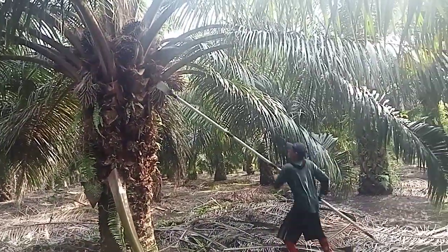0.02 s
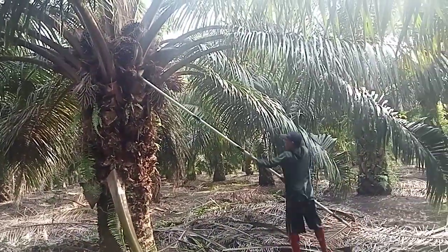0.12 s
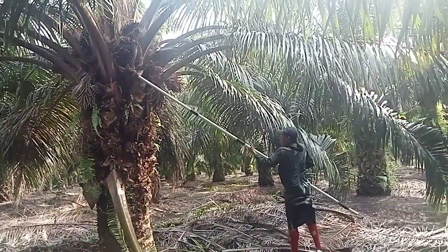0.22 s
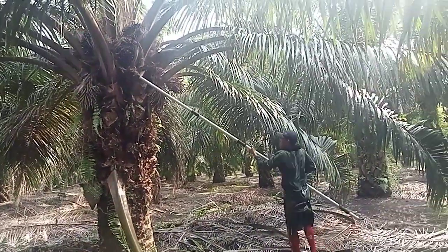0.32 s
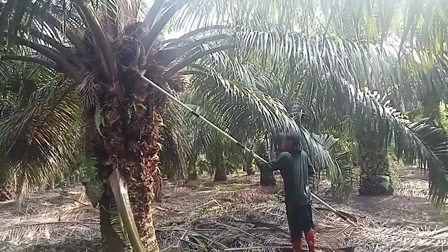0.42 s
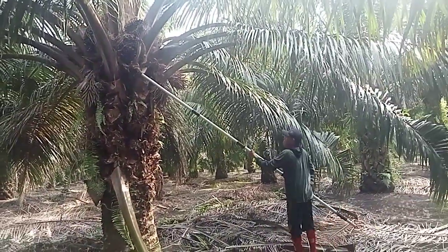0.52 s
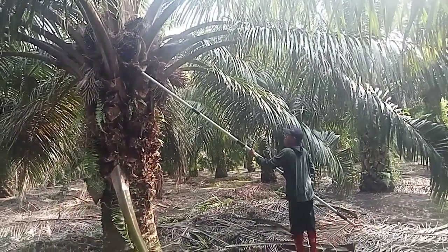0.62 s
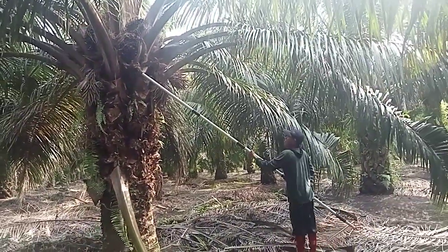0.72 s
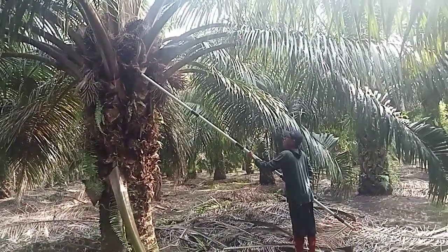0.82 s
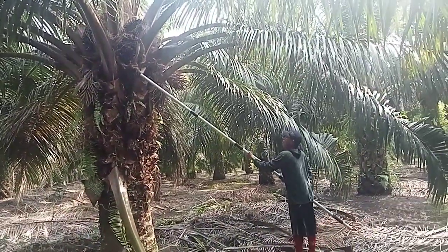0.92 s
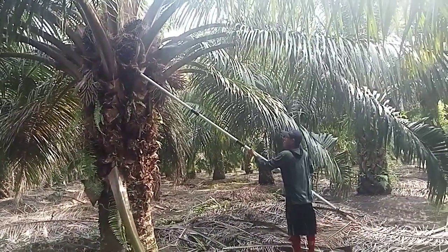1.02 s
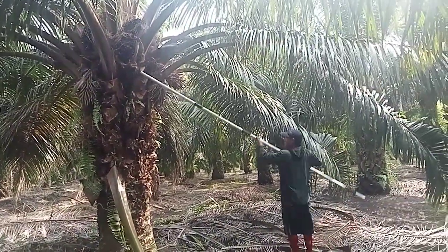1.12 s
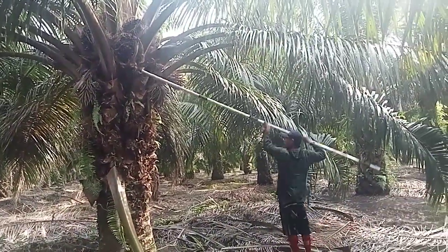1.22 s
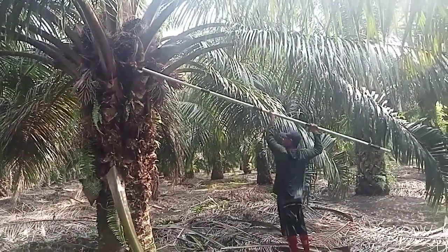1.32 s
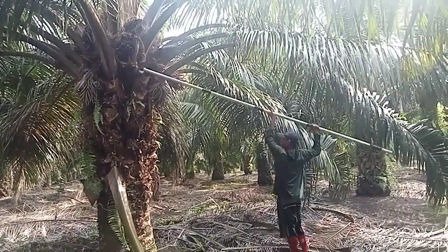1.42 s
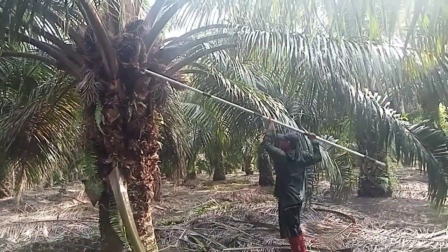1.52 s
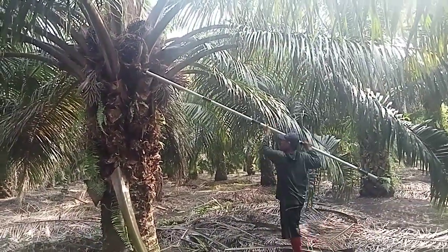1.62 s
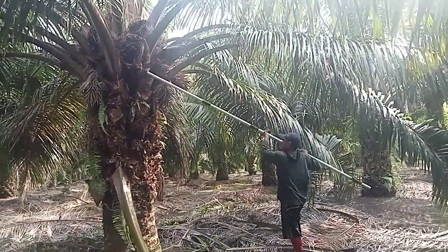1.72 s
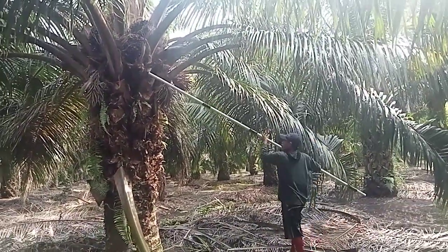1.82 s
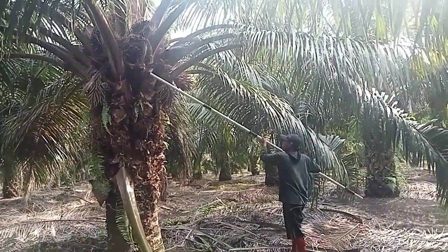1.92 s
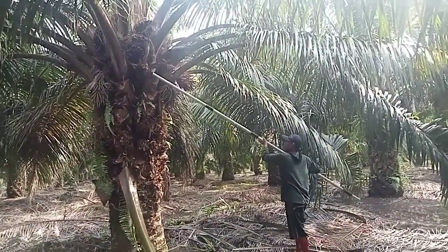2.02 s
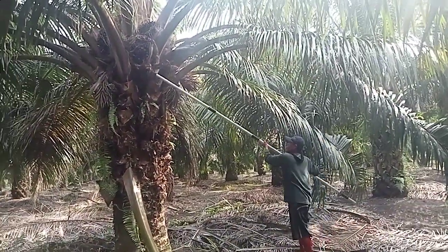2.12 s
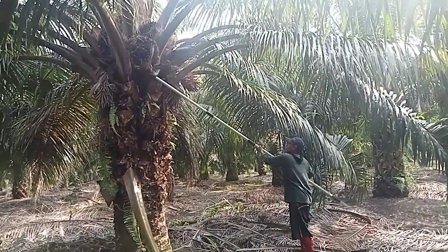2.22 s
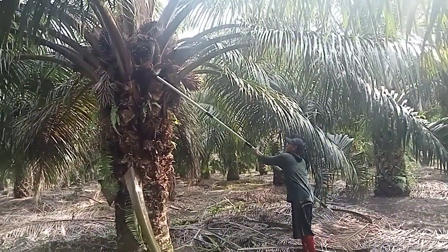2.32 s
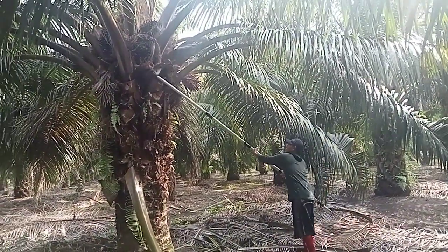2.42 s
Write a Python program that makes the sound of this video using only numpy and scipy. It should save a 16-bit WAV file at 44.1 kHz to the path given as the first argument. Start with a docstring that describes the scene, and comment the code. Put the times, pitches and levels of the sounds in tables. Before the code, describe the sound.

Palm stalk cutting outdoors: one loud crunching chop, a rasping stuttering pull, then a smaller tearing cut

```python
"""One hard chop, a juddering pull and a tearing cut, with knocks, dry snaps and hissing leaflets between:
a sickle on a long pole works in the crown of an oil palm.
Tears, knocks, snaps and leaflets are filtered random fractures; thuds are wobbling low tones; the pull is
a train of stick-slip pulses with rasping grains. The grove adds a faint noise tail, and soft air noise
lies underneath. Both channels are the same."""
import sys
import numpy as np
from scipy import signal
from scipy.fft import rfft, irfft
from scipy.io import wavfile
from scipy.ndimage import uniform_filter1d

SR = 44100
rng = np.random.default_rng(int(sys.argv[2]) if len(sys.argv) > 2 else 0)


def bounce(signal):
    """Save signal as a 16-bit WAV file at the path given by the first command-line argument."""
    frames = np.transpose(np.atleast_2d(signal))
    limited = np.clip(frames, -1, 1)
    pcm = np.round(limited * 32767).astype(np.int16)
    wavfile.write(sys.argv[1], SR, pcm)


N = 110250
T = np.arange(N) / SR
SIZE = 2 ** 18  # FFT length, samples
HZ = np.maximum(np.arange(SIZE // 2 + 1) * SR / SIZE, 1)
FIBRES_PER_S, FIBRE_SPREAD_DB = 12000, 2

# colour of snapping fibres and flicked leaflets: (frequency [Hz], gain [dB])
SNAP_COLOUR = [(100, -28), (500, -15), (1500, -4.5), (2300, -3), (5000, -2.5), (7500, -4.5), (10000, 4),
               (12500, -10), (15500, -12.5)]


def from_db(db):
    """Decibels to amplitude gain."""
    return 10 ** (np.asarray(db) / 20)


def rms_one(x):
    """Scale to rms 1."""
    return x / np.sqrt(np.mean(np.abs(x) ** 2) + 1e-20)


def in_time(rows):
    """Control curve at every sample, linear between (time, value) rows."""
    return np.interp(T, *np.transpose(rows))


def colour(points):
    """Gain at every FFT frequency; dB linear over log frequency."""
    hz, db = np.transpose(points)
    return from_db(np.interp(np.log(HZ), np.log(hz), db))


def peak(hz, width_hz):
    """Gain of one resonance, 1 on top."""
    return 1 / np.sqrt(1 + ((HZ ** 2 - hz ** 2) / (HZ * width_hz)) ** 2)


def body(x, gain):
    """Minimum-phase filter with the shape of gain, scaled to keep the power of white noise."""
    cepstrum = irfft(np.log(rms_one(gain) + 1e-6))
    # fold the cepstrum onto positive time: makes the filter causal
    cepstrum[1:SIZE // 2] *= 2
    cepstrum[SIZE // 2 + 1:] = 0
    response = np.exp(rfft(cepstrum))
    return irfft(rfft(x, SIZE) * response)[:N]


def band(x, hz, width_hz):
    """Two-pole resonance that keeps the power of white noise."""
    r = np.exp(-np.pi * width_hz / SR)
    zeros = np.sqrt((1 - r * r) / 2) * np.array([1, 0, -1])
    poles = [1, -2 * r * np.cos(2 * np.pi * hz / SR), r * r]
    return signal.lfilter(zeros, poles, x + 1e-18)


def butter(x, order, hz, kind="low"):
    """Butterworth filter."""
    return signal.lfilter(*signal.butter(order, hz, kind, fs=SR), x)


def crackle(per_s, spread_db):
    """Random tiny fractures of uneven size and either sign; rms 1."""
    sizes = from_db(spread_db * np.minimum(rng.exponential(1, N), 4))
    signs = rng.choice([-1, 1], N)
    occurs = rng.random(N) < per_s / SR
    return rms_one(sizes * signs * occurs)


def envelope(s, attack_s, hold_s, t60_s):
    """Linear rise from s; exponential decay factor from s + hold_s, 60 dB per t60_s."""
    rise = np.clip((T - s) / attack_s, 0, 1)
    decay_db = -60 * np.clip((T - s - hold_s) / t60_s, 0, 3)
    return rise * from_db(decay_db)


def bursts(rows):
    """Fracture bursts, each with its own envelope and its own bass and treble shelves."""
    bass_edge_hz, treble_edge_hz = 520, 1700
    grains = crackle(FIBRES_PER_S, FIBRE_SPREAD_DB)
    low, middle, high = np.zeros((3, N))
    for s, attack_s, hold_s, t60_s, db, bass_db, treble_db in rows:
        burst = grains * envelope(s, attack_s, hold_s, t60_s) * from_db(db)
        low = low + burst * from_db(bass_db)
        middle = middle + burst
        high = high + burst * from_db(treble_db)
    bass_shelf = butter(low - middle, 1, bass_edge_hz)
    treble_shelf = butter(high - middle, 1, treble_edge_hz, "high")
    return middle + bass_shelf + treble_shelf


def smear(x):
    """All-pass echoes spread each pulse over several milliseconds."""
    # all-pass echoes that spread each pulse: (delay [s], strength [ratio])
    echoes = [(.0011, 0.59), (.0019, .55), (.0031, .45)]
    spectrum = rfft(x, SIZE)
    for delay_s, strength in echoes:
        late = np.exp(-2j * np.pi * HZ * delay_s)
        g = np.clip(strength, 0, .9)
        spectrum = spectrum * (late - g) / (1 - g * late)
    return irfft(spectrum)[:N]


def stalk_resonances():
    """The cut stalk and blade boost or dip the spectrum at their modes."""
    # modes of stalk and blade: (frequency [Hz], width [Hz], boost of the mode alone [dB])
    modes = [(239.8, 25, 1.5), (595, 45, 5), (1101, 16, 3.5), (1453, 100, 7), (1644, 40, 8),
             (2130, 79, 2.5), (2280, 84, 2.5), (2230, 8.3, -0.5), (2740, 29, 4.5), (3964, 8.3, 3.5),
             (4880, 70, 4.5), (5064, 12, 6), (4930, 65, 6.5), (6190, 35, 3), (7007, 23, 7.5)]
    gain = 1 + sum((from_db(db) - 1) * peak(hz, width_hz) ** 2 for hz, width_hz, db in modes)
    return np.abs(gain)


def outdoor_air():
    """Steady coloured noise."""
    air_db = -67
    # colour of the air: (frequency [Hz], gain [dB])
    air_colour = [(20, -27), (50, -12), (100, -3), (200, -6.5), (500, -8), (1000, -11), (2000, -13.5),
                  (6000, -16.5), (15500, -34)]
    return from_db(air_db) * body(rng.standard_normal(N), colour(air_colour))


def grove(x):
    """Trunks and crowns scatter a diffuse tail: convolution with decaying noise."""
    tail_db, t60_s, delay_s = -18, 0.37, .02  # the tail rises over delay_s, then decays
    # colour of the tail: (frequency [Hz], gain [dB])
    tail_colour = [(80, -13), (300, -9), (1000, -6.5), (2000, -3.5), (5000, -5.5), (10000, -6),
                   (15500, -15)]
    tail = rng.standard_normal(N) * envelope(0, delay_s, delay_s, t60_s)
    tail = tail / np.sqrt(np.sum(tail ** 2))
    scattered = signal.fftconvolve(x, tail)[:N]
    return from_db(tail_db) * body(scattered, colour(tail_colour))


def leaflets():
    """Dense fractures as dry leaflets brush each other, plus sparse smeared flicks."""
    ticks_per_s, spread_db = 10000, 3
    flicks_per_s, flick_spread_db, flick_offset_db = 30, 2.5, -13
    # shaking of the leaflets: (time [s], level [dB])
    shaking = [(0, -41.5), (.18, -48), (.4, -46), (.6, -50.5), (.9, -56), (1.07, -59), (1.45, -58),
               (1.6, -63), (1.85, -58.5), (2.02, -69.5), (2.16, -62.5), (2.25, -59.5), (2.36, -45.5),
               (2.5, -54)]
    # colour of the brushing: (frequency [Hz], gain [dB])
    leaf_colour = [(60, -24.5), (130, -11.5), (400, -15), (900, -11.5), (1500, -9), (2400, -0.5),
                   (3300, -5), (5300, 0), (7000, -11), (8300, -7.5), (9700, 1.5), (11000, -7.5),
                   (13000, -16), (15500, -16)]
    level_db = in_time(shaking)
    brushing = body(crackle(ticks_per_s, spread_db) * from_db(level_db), colour(leaf_colour))
    flicks = crackle(flicks_per_s, flick_spread_db) * from_db(level_db + flick_offset_db)
    return brushing + body(smear(flicks), colour(SNAP_COLOUR))


def knocks():
    """The pole knocks on stalks: short fracture bursts ring the stalk modes."""
    attack_s, hold_s = 0.0015, 0.00096
    # knocks: (time [s], level [dB], t60 [s], bass [dB], treble [dB])
    hits = [(0.192, -41.5, 0.09, -9, 3), (0.442, -50.5, 0.3, 8, -9), (.537, -36.5, 0.099, -0.5, 2.5),
            (0.634, -46.5, 0.13, 6, 5), (1.091, -33, 0.014, 3, -14), (1.0989, -35.5, 0.067, -11, -3.5),
            (1.172, -34, 0.032, 5.5, -24), (1.447, -39, 0.046, 8.5, -6), (1.661, -45, 0.045, 1, -7),
            (1.725, -53.5, 0.043, -7, 4.5), (1.814, -66.5, 0.057, -3, 10), (1.886, -46, 0.088, -7, -6),
            (2.088, -66, .1, -6, 5.5), (2.2647, -34.5, 0.067, 12, -2.5), (2.402, -33, 0.036, -7, -6)]
    # colour of a knock: (frequency [Hz], gain [dB])
    knock_colour = [(60, -35), (200, -13.5), (400, -10), (560, -4), (790, -8.5), (970, -4.5), (1250, -8.5),
                    (1600, -3), (2500, -9.5), (3700, -10), (5500, -8), (7500, -21), (9800, -11.5),
                    (12000, -22), (15500, -25)]
    rows = [(s, attack_s, hold_s, t60_s, db, bass_db, treble_db)
            for s, db, t60_s, bass_db, treble_db in hits]
    return body(bursts(rows), colour(knock_colour) * stalk_resonances())


def snaps():
    """Single dry fibres break: a broad crack and a short pitched ring."""
    width_share = 0.28  # ring bandwidth / pitch
    # snaps: (time [s], drive level [dB], pitch [Hz], t60 [s], broad crack re drive [dB])
    breaks = [(0.3362, -24.5, 2260, 0.027, -27), (.788, -47.5, 8400, .018, -7),
              (1.143, -34.5, 2330, 0.025, -19), (1.1445, -60, 1920, 0.02, -26),
              (1.143, -37.5, 4930, 0.023, -20), (1.2512, -39, 5500, 0.018, -14),
              (1.3295, -48, 6260, .02, -18), (1.3355, -28.5, 4440, 0.02, -7),
              (1.4461, -39.5, 5000, 0.026, -20), (1.634, -45, 4970, 0.086, -16),
              (1.662, -33.5, 5100, 0.009, -19), (1.725, -53, 4020, 0.026, -9), (2.203, -52, 7040, .04, -9),
              (2.2434, -46, 7600, 0.011, -16), (2.2511, -43, 5200, .03, -16),
              (2.2644, -29.5, 4800, 0.013, -24), (2.3279, -31, 3580, 0.023, -18),
              (2.360, -37, 3870, 0.018, -6), (2.4694, -28.5, 5400, 0.023, -12)]
    out = 0
    grains = crackle(2 * FIBRES_PER_S, FIBRE_SPREAD_DB)
    for s, db, hz, t60_s, crack_db in breaks:
        burst = grains * envelope(s, 0.0002, .0008, t60_s) * from_db(db)
        ring = butter(band(burst, hz, hz * width_share), 2, min(1.05 * hz, 18000))
        out = out + ring + burst * from_db(crack_db)
    return body(out, colour(SNAP_COLOUR))


def thuds():
    """The heavy stalk gives: dull damped tones, unsteady in pitch and strength."""
    attack_s, low_edge_share = 0.0032, 0.52
    grit_share, wobble_share = .6, .6  # rms strength wobble; scale on the wobble column
    # thuds: (time [s], level before band-pass [dB], pitch [Hz], pitch wobble before wobble_share [Hz], t60 [s])
    shudders = [(0.23, -21.5, 245, 35.3, .09), (0.263, -44, 93, 30, 0.29), (.352, -42, 289, 99, 0.1),
                (1.094, -51.5, 575, 101.5, 0.06), (1.304, -32, 669, 39.7, 0.16),
                (1.364, -29, 382.2, 130, 0.067), (1.372, -36, 207.8, 52, 0.3),
                (1.48, -42.5, 344, 150.2, .09), (1.521, -50.5, 270.5, 101, .13), (1.635, -55, 413, 149, .2),
                (1.812, -56, 403, 152.4, 0.21), (1.883, -60, 414, 145, .12), (2.268, -36, 288, 203, .08),
                (2.295, -34, 453, 199.4, 0.22), (2.314, -41.5, 198, 98.5, 0.25),
                (2.424, -44.5, 427, 146, .12)]
    out = 0
    for s, db, hz, wobble_hz, t60_s in shudders:
        wobble, grit = rms_one(uniform_filter1d(rng.standard_normal((2, N)), size=130))
        cycles = np.cumsum(hz + wobble_share * wobble_hz * wobble) / SR
        shudder = rms_one((1 + grit_share * grit) * np.sin(2 * np.pi * cycles))
        shudder = shudder * envelope(s, attack_s, attack_s, t60_s) * from_db(db)
        out = out + butter(shudder, 2, [hz * low_edge_share, 2 * hz], "band")
    return out


def pull():
    """Stick-slip pulses shake the stalk, ever less evenly; each slip rasps a few fibres."""
    slip_decay_s, slip_grit_db, slip_spread_db = .0045, -5.5, 2.24
    stuck_grit_share = .35  # grit left between slips, re the start of a slip's decay
    rasp_grains_per_s, rasp_spread_db = 2700, 2
    # slip rate: (time [s], nominal rate [slips/s])
    slip_rate = [(1.16, 130), (1.2, 118), (1.27, 118.4), (1.32, 112), (1.39, 97), (1.56, 101)]
    # unevenness: (time [s], rms spread of log rate [nepers])
    slip_jitter = [(1.17, 0.042), (1.3, 0.046), (1.37, .2), (1.56, .3)]
    # force of the pull: (time [s], level [dB])
    force = [(1.14, -120), (1.158, -44.5), (1.172, -40), (1.22, -36.5), (1.26, -34.5), (1.33, -36.5),
             (1.38, -35.5), (1.42, -39), (1.47, -59.5), (1.54, -55), (1.6, -72), (1.66, -120)]
    # colour of the judder: (frequency [Hz], gain [dB])
    judder_colour = [(50, -45.5), (115, -17), (170, -7), (235, 0.5), (300, -9.5), (370, 2.5), (470, -2),
                     (640, 0), (800, -18), (980, -8.5), (1200, -10.5), (1340, -22.5), (1490, -10.5),
                     (1900, -18), (2370, -21), (3000, -21), (5000, -24.5), (8000, -40), (15500, -53)]
    # rasp of fibres on the blade: (time [s], level [dB])
    rasp_level = [(1.15, -110), (1.174, -46.5), (1.22, -49.5), (1.26, -44.5), (1.295, -42.5), (1.34, -37.5),
                  (1.365, -38.5), (1.405, -38), (1.46, -51.5), (1.56, -79), (1.62, -110)]
    # colour of the rasp: (frequency [Hz], gain [dB])
    rasp_colour = [(200, -18), (1000, -4), (2400, 2.5), (3000, -9), (4800, -3), (7000, -12), (8500, -11.5),
                   (9700, -9.5), (12000, -20.5), (15500, -24.5)]

    wander = rms_one(uniform_filter1d(rng.standard_normal(N), size=300))
    rate = in_time(slip_rate)
    cycles = np.cumsum(rate * np.exp(in_time(slip_jitter) * wander)) / SR
    slip_sizes = from_db(slip_spread_db * rng.standard_normal(N))
    slips = rms_one(np.diff(np.floor(cycles), prepend=0) * slip_sizes)  # one pulse per cycle
    since_slip_s = (cycles % 1) / rate
    gate = rms_one(np.exp(-since_slip_s / slip_decay_s) + stuck_grit_share)

    grit = from_db(slip_grit_db) * gate * rng.standard_normal(N)
    judder = body((slips + grit) * from_db(in_time(force)), colour(judder_colour))
    grains = np.sqrt(gate) * crackle(rasp_grains_per_s, rasp_spread_db)
    rasp = body(grains * from_db(in_time(rasp_level)), colour(rasp_colour))
    return smear(judder) + rasp


def tears():
    """The blade tears through fibres: dense fracture bursts ring the stalk modes."""
    # tears: (time [s], attack [s], decay start after onset [s], t60 [s], level [dB], bass [dB], treble [dB])
    rips = [(.225, 0.0022, 0.016, 0.037, -26, 7, 3.5), (.2325, 0.00089, 0.012, 0.077, -12.5, 3, -1),
            (.251, 0.0045, 0.019, 0.11, -15.5, -15, -3), (.310, 0.0035, 0.016, 0.15, -24, -22, -13),
            (.3325, .002, 0.002, .05, -26, -2, -18), (1.326, .001, 0.0031, 0.038, -36, 13.5, 1.5),
            (1.337, 0.00081, 0.0021, 0.059, -30.5, -2, -5.5),
            (1.376, 0.00064, 0.0046, 0.044, -28, 8.5, -16), (2.2835, 0.00038, 0.02, 0.042, -35, 8, 0),
            (2.308, 0.00067, 0.016, 0.08, -39.5, -3, 4), (2.326, .001, 0.0036, 0.079, -29.5, 6, -22),
            (2.360, 0.0011, 0.0085, 0.073, -29, -3, -9), (2.393, 0.0011, 0.01, 0.27, -46, 5, -9)]
    # colour of tearing fibre: (frequency [Hz], gain [dB])
    fibre_colour = [(40, -47), (65, -40), (90, -26), (160, -15), (240, -2.5), (340, -8), (500, -8),
                    (790, -9), (1100, -7), (1600, -6), (2200, -3), (3100, -7.5), (5100, -1), (6500, -6),
                    (8100, -10), (9300, -2.5), (11000, -13), (13000, -20.5), (15500, -18.5)]
    return body(bursts(rips), colour(fibre_colour) * stalk_resonances())


def scene():
    """The work, thin in the deep bass, with its tail, the leaflets and the air; both sides alike."""
    low_cut_hz = 69
    work = knocks() + snaps() + thuds() + pull() + tears()
    work = butter(work, 2, low_cut_hz, "high")
    mono = outdoor_air() + leaflets() + grove(work) + work
    return np.tile(mono, (2, 1))


def record(dry):
    """Peaks are rounded off towards a ceiling, then the top is cut steeply."""
    peak_limit, cutoff_hz = .8, 15550  # amplitude; Hz
    rounded = dry / (1 + (dry / peak_limit) ** 4) ** .25
    top_cut = signal.ellip(12, .1, 80, cutoff_hz, fs=SR, output="sos")
    return signal.sosfilt(top_cut, rounded)


dry = scene()
out = record(dry)
bounce(out)
```